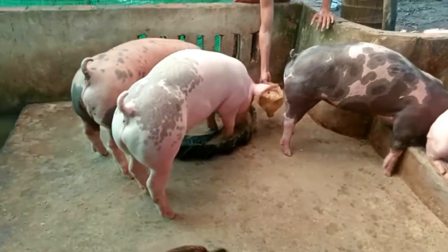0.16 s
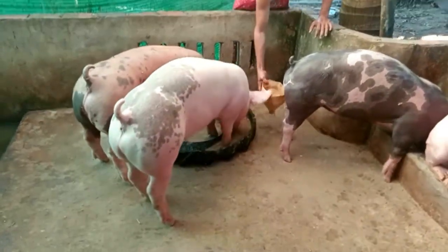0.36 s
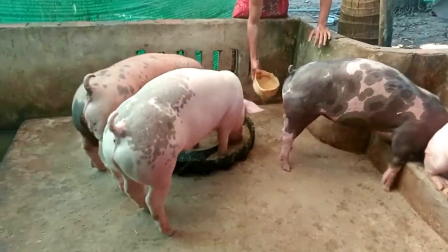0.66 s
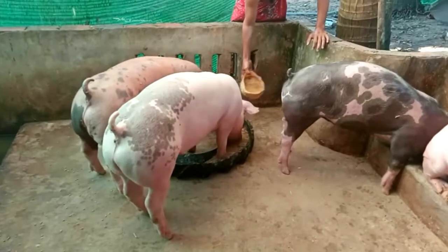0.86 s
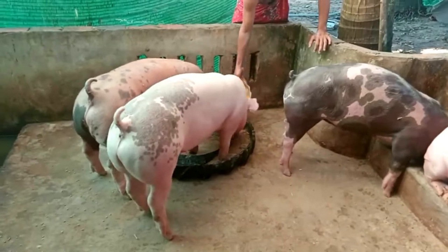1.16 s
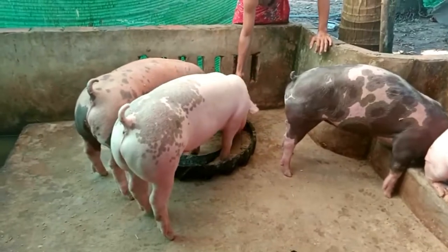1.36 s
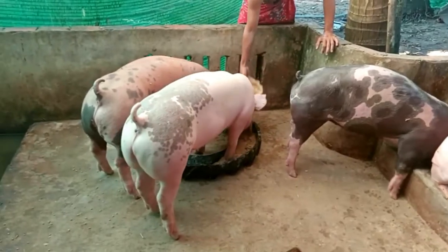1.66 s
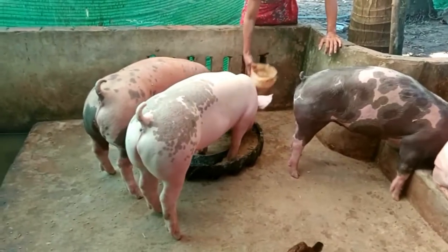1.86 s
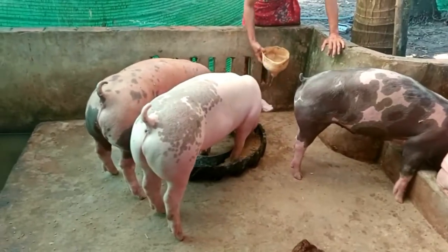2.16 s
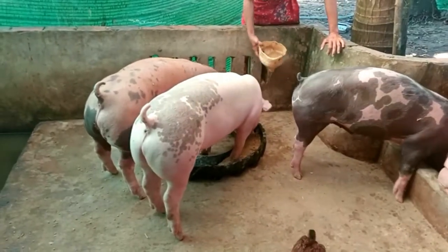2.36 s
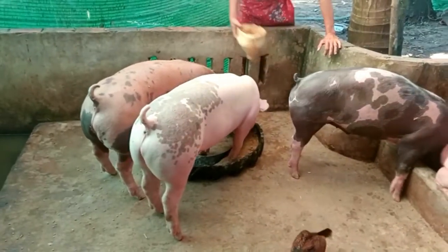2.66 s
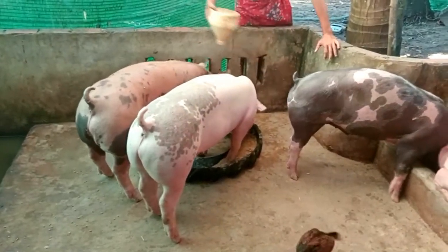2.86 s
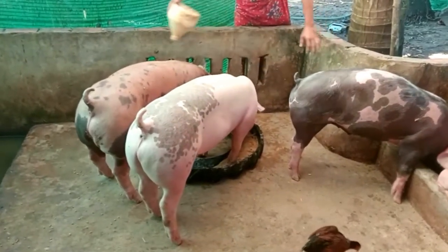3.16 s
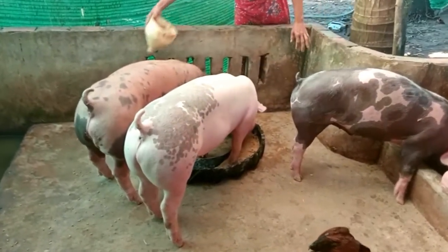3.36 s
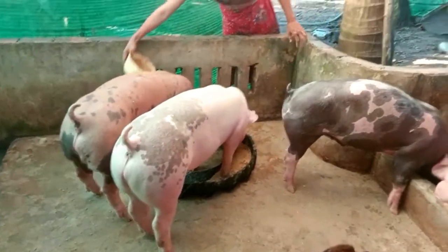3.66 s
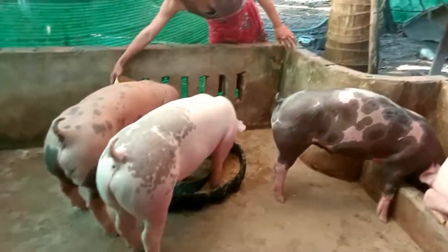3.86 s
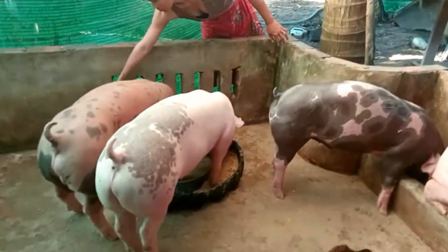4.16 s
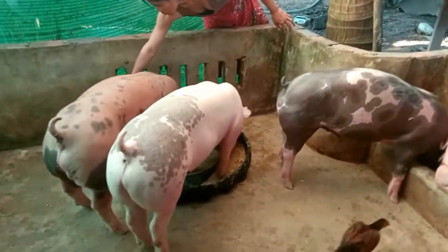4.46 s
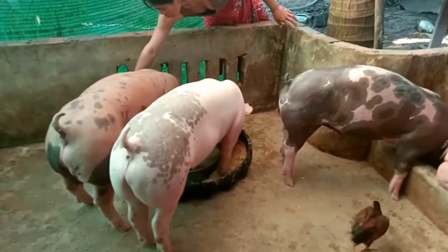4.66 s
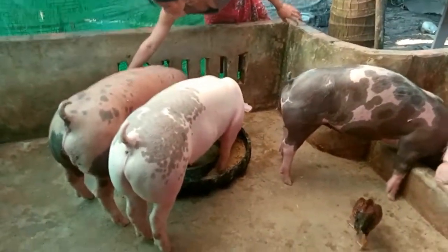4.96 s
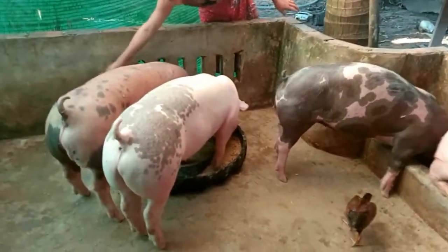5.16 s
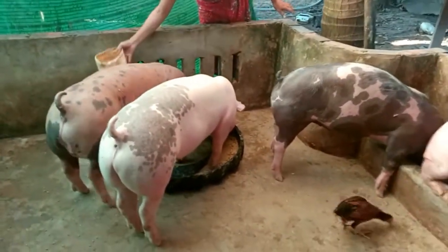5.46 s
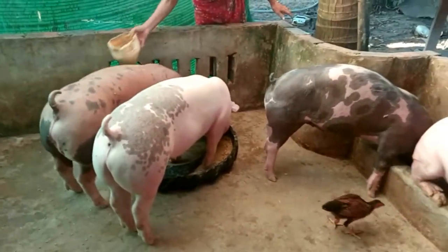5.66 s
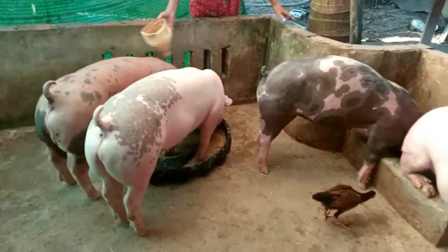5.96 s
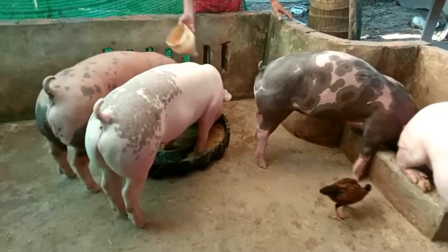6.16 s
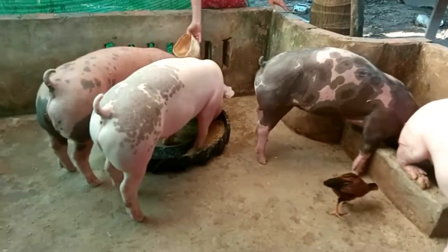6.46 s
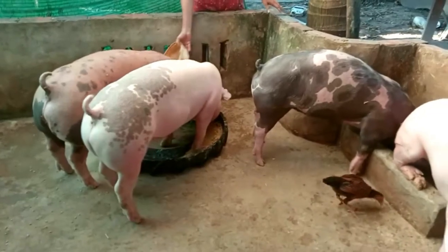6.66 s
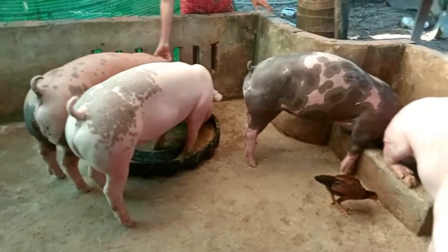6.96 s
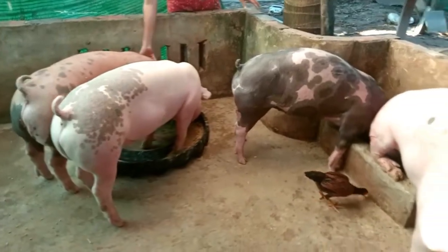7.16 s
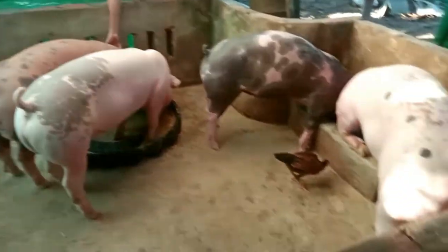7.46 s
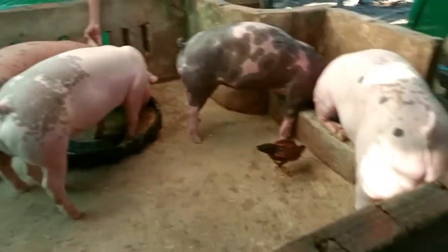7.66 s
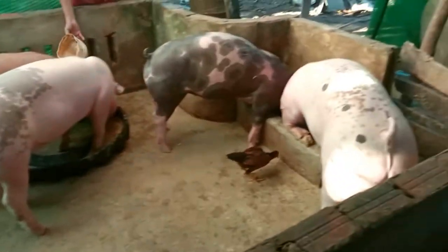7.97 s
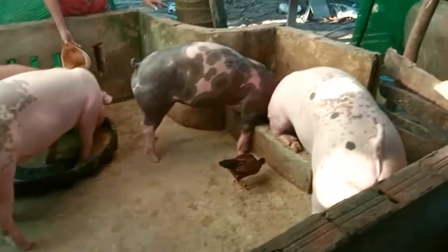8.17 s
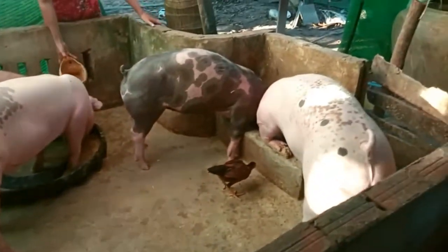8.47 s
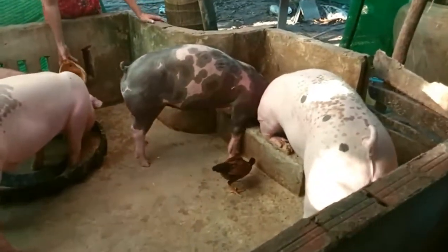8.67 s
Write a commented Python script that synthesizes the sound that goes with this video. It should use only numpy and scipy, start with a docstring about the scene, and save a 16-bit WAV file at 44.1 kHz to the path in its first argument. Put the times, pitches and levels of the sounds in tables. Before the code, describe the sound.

Pigs gobble mash from a bowl and trough, captured fairly close in mono. It starts with softer licking and squelching, then sharp saliva smacks, mouth pops and low jaw knocks build around a steady, uneven chomping rhythm. Muffled short grunts and fine saliva crackles slip between bites. The loudest, juiciest chomps come in the last two seconds, with a short hard-walled pen echo.

```python
"""Pigs chomp wet mash from a bowl and a trough in a concrete pen, over the faint hush of the yard.
From the start tongues lick and slurp between soft grunts, as bursting films and narrow bands of noise.
Lips smack as torn saliva rings the mouth; suction pops and jaw thuds join in, as damped low rings.
About three bites a second swell in the squelch, spray, hollow and throat; later saliva crackles too.
The low walls of the pen answer briefly."""
import sys
import numpy as np
from scipy import signal
from scipy.fft import rfft, irfft, next_fast_len
from scipy.io import wavfile
from scipy.ndimage import uniform_filter1d, map_coordinates

SR = 44100
rng = np.random.default_rng(int(sys.argv[2]) if len(sys.argv) > 2 else 0)


def output_pcm(signal):
    """Save a mono or channel-first signal as 16-bit PCM at the path in sys.argv[1].

    Samples are clipped to [-1, 1] before scaling.
    """
    pcm = np.clip(np.atleast_2d(signal).T, -1, 1) * 32767
    wavfile.write(sys.argv[1], SR, np.round(pcm).astype(np.int16))


N = 388962  # samples in the scene

# Lips and tongue tearing loose. Each row: start in seconds, peak of the direct sound in dB,
# mouth resonance in Hz.
SMACK_EVENTS = [(0.164, -19, 1220), (0.683, -21.5, 1780), (1.158, -19.5, 2340), (1.33, -22, 1570),
                (1.891, -16.5, 2160), (2.072, -14.5, 2090), (2.099, -12.5, 2230), (2.122, -11.5, 1900),
                (2.196, -17.5, 1740), (2.328, -16.5, 2280), (2.666, -13, 3330), (2.735, -5, 2980),
                (2.754, -24, 2550), (2.917, -14.5, 2280), (3.01, -15.5, 3300), (3.07, -10, 1680),
                (3.29, -19, 2630), (3.621, -14, 2940), (3.731, -15, 1840), (3.928, -13.5, 1320),
                (4.014, -13.5, 2410), (4.272, -21, 2940), (4.303, -13.5, 3080), (4.862, -17, 2420),
                (5.305, -18, 3040), (5.58, -18, 2900), (5.64, -12, 1950), (6.134, -19, 1405),
                (6.456, -15.5, 2840), (6.501, -6.5, 2000), (6.842, -9.5, 2210), (7.067, -15, 2180),
                (7.161, -13, 3660), (7.207, -9, 1390), (7.263, -8.5, 2540), (7.349, -12.5, 1890),
                (7.569, -6.5, 3280), (7.882, -9.5, 2470), (8.184, -12.5, 2160), (8.267, -9.5, 3300),
                (8.523, -9.5, 2050), (8.555, -8.5, 2080), (8.622, -15, 2840), (8.679, -6.5, 2600),
                (8.798, -11, 2060)]


def amp(db):
    """Decibels to gain."""
    return 10 ** (np.asarray(db) / 20)


def unit(x):
    """Scale to rms 1."""
    return x / np.sqrt(np.mean(x ** 2) + 1e-20)


def along(points, hz):
    """(Hz, value) points joined on a log frequency axis."""
    f, v = np.transpose(points)
    return np.interp(np.log(hz + 1), np.log(f + 1), v)


def filtered(x, response):
    """x times a complex response of frequency, zero-padded so that the end does not wrap round."""
    m = next_fast_len(len(x) + 8192)
    spectrum = rfft(x, m) * response(np.fft.rfftfreq(m, 1 / SR))
    return irfft(spectrum, m)[:len(x)]


def coloured(x, curve):
    """x through a filter curve in dB, at rms 1."""
    return unit(filtered(x, lambda hz: amp(along(curve, hz))))


def resonance(f, centre, width):
    """Causal response of one damped mode."""
    return 1j * f * width / (centre ** 2 - f ** 2 + 1j * f * width)


def add(track, s, sound):
    """Mix a sound into the track at s seconds."""
    part = track[max(round(s * SR), 0):][:len(sound)]
    part += sound[:len(part)]


def in_pen(x, wet_db):
    """x plus the echo of the concrete walls, which changes six times a second as the heads move."""
    # How long the pen rings. Each row: frequency in Hz, time to fall by 60 dB in seconds.
    pen_decay = [(150, 0.28), (700, 0.29), (2000, 0.36), (5500, 0.04), (14000, 0.14)]
    out = np.zeros(min(len(x) + SR // 2, N))
    hop = SR // 6
    for start in range(0, len(x), hop):
        hz, t, z = signal.stft(rng.standard_normal(SR // 4), SR, nperseg=256)
        decay = amp(-60 * t / along(pen_decay, hz)[:, None])
        tail = signal.istft(z * decay, SR, nperseg=256)[1]
        # direct sound, a short gap, then the diffuse tail
        answer = np.r_[1, np.zeros(SR // 300), amp(wet_db) * tail / np.linalg.norm(tail)]
        add(out, start / SR, signal.fftconvolve(x[start:start + hop], answer))
    return out


def yard():
    """The faint hush of the yard: steady coloured noise."""
    # Tone of the hush. Each row: frequency in Hz, relative level in dB per Hz.
    yard_curve = [(25, -29), (60, -1.5), (160, -2.5), (400, -17), (2300, 3.5), (5300, -29), (7900, -30),
                  (9800, -44), (15500, -37)]
    return amp(-42.5) * coloured(rng.standard_normal(N), yard_curve)


def chewing():
    """Tongues squelch, teeth press spray from the mash, mouth and throat ring, uneven with the lumps."""
    # Filters for tongue, spray, mouth and throat. Each row: frequency in Hz, relative gain in dB.
    squelch_curve = [(300, -45), (700, -2), (1100, -8), (1600, -4.5), (2100, -1.5), (2700, -1.5),
                     (3400, -2.5), (4200, -6.5), (5300, -18), (9000, -60)]
    spray_curve = [(400, -20), (900, -24.5), (2000, -1.5), (3500, 10.5), (4400, 5.5), (5300, 2), (6600, -1),
                   (7800, 1), (9000, -11), (10500, -16), (12000, -14.5), (13500, -11.5), (15500, -6)]
    hollow_curve = [(200, -33), (330, -8), (420, -7), (485, -0.5), (530, -4), (615, 2.5), (700, -7.5),
                    (900, -10.5), (1400, 1)]
    throat_curve = [(25, -47), (45, -38), (62, -27), (80, -17), (115, -4.5), (165, 2), (190, -6),
                    (225, 0.5), (290, -6.5), (400, -21), (700, -44)]
    fizz_hz = 5200  # above this the finest droplets come and go on their own
    squelch_gain, spray_gain, hollow_gain, throat_gain = mouth_levels()

    squelch = bubbles(rate=650, pitch_hz=1836, spread=0.715, cycles=5.3, size_db=5.0, size=440, wander=0.2546)
    squelch = steady(coloured(in_pen(squelch, wet_db=1.5), squelch_curve), window=0.042)
    squelch *= squelch_gain * lumps(depth_db=1.4, rate=30)

    spray = bubbles(rate=5000, pitch_hz=4410, spread=1.16, cycles=0.74, size_db=1.0, size=64, wander=0.1)
    spray = steady(coloured(in_pen(spray, wet_db=-2.5), spray_curve), window=0.066)
    fizz = filtered(spray, lambda hz: 1 - 1 / (1 + (hz / fizz_hz) ** 8))
    coarse = lumps(depth_db=1.9, rate=25) * (spray - fizz)
    fine = lumps(depth_db=2.3, rate=35) * fizz
    wet = squelch + spray_gain * (coarse + fine)

    hollow = bubbles(rate=500, pitch_hz=600, spread=0.65, cycles=1.17, size_db=3.5, size=440, wander=0.19)
    hollow = steady(coloured(in_pen(hollow, wet_db=-1), hollow_curve), window=0.047)
    hollow *= hollow_gain * lumps(depth_db=2.5, rate=25)

    throat = steady(coloured(rng.standard_normal(N), throat_curve), window=0.13)
    throat *= throat_gain * lumps(depth_db=2.5, rate=24)
    return wet * lips() + hollow + throat


def mouth_levels():
    """Gains of squelch, spray, hollow and throat: powers of bites and licks add to the idle chewing."""
    # The other mouths never rest. Levels in dB of squelch, spray, hollow and throat.
    idle_db = [-41.5, -49, -58, -53.5]
    # The jaw closes on a mouthful. Each row: start in seconds, length in seconds, tongue squelch in dB,
    # spray of crushed mash in dB, hollow of the mouth in dB.
    bite_strokes = [(-0.005, 0.018, -27.5, -31, -32.5), (0.341, 0.18, -28.5, -36.0, -28.5),
                    (0.76, 0.06, -25, -33.5, -32.5), (1.089, 0.063, -26, -32, -37.5),
                    (1.368, 0.11, -27, -39.5, -37.5), (1.689, 0.024, -27.5, -40, -37.5),
                    (1.995, 0.127, -28.0, -36, -35), (2.312, 0.14, -25.0, -35, -33.5),
                    (2.631, 0.058, -23, -31.5, -29.5), (2.938, 0.09, -23, -33.5, -32),
                    (3.359, 0.088, -24.5, -32.5, -32.5), (3.622, 0.13, -23.5, -33.5, -35.5),
                    (3.961, 0.059, -20, -28.5, -26.5), (4.283, 0.06, -21, -30, -26.5),
                    (4.572, 0.091, -24, -35, -41), (4.922, 0.12, -22, -30.5, -32),
                    (5.273, 0.098, -22, -29.5, -28), (5.669, 0.055, -26, -28, -32),
                    (6.125, 0.086, -24, -33, -33), (6.479, 0.038, -22, -29, -30),
                    (6.806, 0.06, -26.5, -31.5, -37.5), (7.1, 0.2, -23.5, -29.5, -33.5),
                    (7.269, 0.11, -25, -33.5, -31.5), (7.531, 0.13, -19, -25.5, -30),
                    (7.892, 0.1, -18.0, -26.0, -29), (8.227, 0.14, -20, -28, -27.5),
                    (8.57, 0.15, -19.5, -27.5, -30.5)]
    # Softer tongue work between the bites. Each row: start in seconds, length in seconds,
    # tongue squelch in dB, hollow of the mouth in dB.
    lick_strokes = [(0.115, 0.17, -32, -40), (0.563, 0.21, -32.5, -39.5), (0.993, 0.08, -31, -44),
                    (1.315, 0.03, -28, -40.5), (1.58, 0.076, -36.5, -50), (1.898, 0.081, -35, -46.5),
                    (2.194, 0.088, -27.5, -36), (2.551, 0.039, -26.0, -44), (2.736, 0.143, -29.5, -40),
                    (3.068, 0.086, -30, -39.5), (3.259, 0.051, -31, -37), (3.492, 0.097, -29.5, -38.5),
                    (3.785, 0.035, -27, -36.5), (4.068, 0.043, -27, -32), (4.201, 0.026, -31.5, -41),
                    (4.402, 0.033, -27, -36), (4.686, 0.069, -28, -42.0), (4.848, 0.031, -36, -45),
                    (5.153, 0.094, -31, -48), (5.428, 0.042, -30, -43), (5.554, 0.058, -25, -39.5),
                    (5.764, 0.14, -33.5, -42), (5.938, 0.1, -34.5, -54), (6.223, 0.032, -32.0, -37),
                    (6.407, 0.045, -30, -45), (6.556, 0.13, -42, -47), (6.715, 0.091, -30.5, -56),
                    (7.047, 0.045, -30, -37.5), (7.39, 0.06, -28.5, -43), (7.693, 0.095, -30.5, -40),
                    (8.04, 0.079, -26, -34.5), (8.183, 0.027, -22.5, -52), (8.417, 0.052, -34, -57),
                    (8.53, 0.023, -22.5, -44), (8.779, 0.05, -24, -36)]
    lick_spray_db = -15  # relative to the squelch of the lick
    bite_throat_db, lick_throat_db = -6, -5  # relative to the hollow of the mouth
    throat_lag_s = 0.013  # the throat follows the mouth

    power = amp(idle_db)[:, None] ** 2 * np.ones(N)
    for s, length, squelch_db, spray_db, hollow_db in bite_strokes:
        gains = amp([squelch_db, spray_db, hollow_db, hollow_db + bite_throat_db])
        power += np.outer(gains ** 2, stroke(s, length, attack=0.034, release=0.042, arch_db=2.0))
    for s, length, squelch_db, hollow_db in lick_strokes:
        gains = amp([squelch_db, squelch_db + lick_spray_db, hollow_db, hollow_db + lick_throat_db])
        # a negative arch makes the lick dip halfway: strongest at its ends
        power += np.outer(gains ** 2, stroke(s, length, attack=0.019, release=0.033, arch_db=-1.5))
    squelch, spray, hollow, throat = np.sqrt(power)
    late_throat = np.interp(np.arange(N) - throat_lag_s * SR, np.arange(N), throat)
    return squelch, spray, hollow, late_throat


def stroke(s, length, attack, release, arch_db):
    """Power of one mouth movement: it swells, holds in an arch and dies away (time constants in s)."""
    t = np.arange(-SR // 4, int((length + .4) * SR)) / SR
    fade = np.exp(np.minimum(t, 0) / attack - np.maximum(t - length, 0) / release)
    arch = amp(arch_db * (np.sin(np.pi * np.clip(t / length, 0, 1)) - 1.0))
    power = np.zeros(N + SR)  # a second of lead-in, for strokes that swell before the start
    add(power, s + t[0] + 1, (fade * arch) ** 2)
    return power[SR:]


def bubbles(rate, pitch_hz, spread, cycles, size_db, size, wander):
    """Bursting films of wet feed: damped rings, size samples long, whose pitch wanders with the tongue."""
    count = int(rate * N / SR)
    tongue = rng.standard_normal(N // 1400)
    start, luck, pitch = rng.random((count, 3)).T[:, :, None]
    shape = map_coordinates(tongue, [start * (len(tongue) - 1)])
    hz = pitch_hz * np.exp(spread * (2 * pitch - 1) + wander * shape)
    hz = np.clip(hz, 80, SR / 2.5)
    t = np.arange(size) / SR
    # many small films, a few large ones
    strength = amp(size_db * np.minimum(-np.log(1 - luck), 3)) * np.sqrt(hz)
    rings = strength * np.exp(-t * hz / cycles) * np.sin(2 * np.pi * hz * t)
    where = (start * N).astype(int) + np.arange(size)
    return unit(np.bincount(where.ravel(), rings.ravel(), N)[:N])


def steady(x, window):
    """x with swells longer than the window (s) evened out, so that only the grain is left."""
    return x / np.sqrt(np.abs(uniform_filter1d(x ** 2, int(window * SR))) + 1e-6)


def lumps(depth_db, rate):
    """A gain that wavers as lumps of feed pass through the mouth."""
    return unit(amp(depth_db * wobble(rate)))


def wobble(rate):
    """A smooth random curve, rate knots a second."""
    knots = rng.standard_normal(N // 200)
    return map_coordinates(knots, [np.arange(N) * rate / SR], mode="mirror")


def lips():
    """Gain of the wet noise: sealed lips hush it just before a smack."""
    seal_db, seal_s = -3.0, 0.038  # change at the smack, time constant of the approach
    db = np.zeros(N)
    before = np.arange(SR // 10)[::-1] / SR
    for s, _, _ in SMACK_EVENTS:
        add(db, s - before[0], seal_db * np.exp(-before / seal_s))
    return amp(db)


def mouth_sounds():
    """Slurps, grunts, smacks, pops, thuds and crackles, each with its own echo."""
    # Air sucked past the tongue, the gap changing shape. Each row: start in seconds, length in seconds,
    # start pitch in Hz, end pitch in Hz, rms of the direct sound in dB.
    slurp_events = [(0.067, 0.046, 777, 970, -36.5), (.16, 0.035, 900, 835, -35),
                    (.68, 0.058, 812, 765, -38), (0.94, 0.049, 1416, 1110, -37.5),
                    (0.975, 0.056, 1073, 1137, -34.5), (1.014, .04, 1200, 1670, -41),
                    (0.951, 0.063, 2590, 2000, -35.5), (1.272, 0.045, 2130, 2680, -36),
                    (1.485, 0.032, 1190, 1250, -37.5), (1.562, .05, 2035, 1726, -36.5),
                    (1.825, .05, 1690, 1970, -37), (2.441, 0.038, 1755, 1690, -31),
                    (3.23, 0.041, 855, 1000, -46), (3.92, 0.027, 1275, 1880, -20.5),
                    (4.071, 0.066, 2500, 2570, -31.5), (4.188, .07, 1102, 770, -35.5),
                    (4.587, 0.058, 1860, 2210, -27), (5.094, 0.026, 3580, 3500, -35),
                    (5.69, .04, 3380, 3240, -28.5), (5.922, 0.053, 1937, 2100, -33.5),
                    (6.021, 0.091, 1590, 850, -39.5), (6.258, .09, 2750, 2670, -51),
                    (6.682, 0.15, 3340, 2750, -40), (7.372, 0.13, 3365, 2725, -34),
                    (7.8, 0.033, 1344, 1360, -34.5), (8.774, 0.051, 1985, 2170, -26)]
    # Soft grunts with a closed mouth. Each row: start in seconds, length in seconds, pitch in Hz,
    # rms of the direct sound in dB.
    grunt_events = [(.075, 0.048, 183, -44), (.24, .09, 239, -39), (.6, 0.053, 226, -40.5),
                    (1.578, 0.057, 211, -38.5), (1.945, 0.06, 166, -45), (2.91, 0.058, 162, -39),
                    (3.065, .05, 173, -47), (3.37, 0.043, 244, -36), (4.09, 0.067, 162, -39),
                    (4.41, 0.053, 184, -40), (5.035, 0.044, 219, -37.5), (5.135, 0.068, 203, -44),
                    (5.46, 0.055, 204, -40), (5.58, 0.11, 214, -37), (5.754, 0.04, 201, -32),
                    (5.951, 0.06, 213, -36), (6.15, 0.053, 157.5, -41), (6.288, 0.12, 205, -40.5),
                    (6.745, .05, 190, -41), (7.005, 0.068, 161, -43), (7.615, 0.058, 296, -37),
                    (7.81, 0.047, 217, -44), (8.05, 0.063, 201, -34), (8.375, 0.038, 215, -42),
                    (8.45, 0.042, 160, -39), (8.738, 0.049, 219.5, -35.5)]
    # Suction pops of the opening mouth. Each row: start in seconds, peak of the direct sound in dB,
    # cavity pitch in Hz.
    pop_events = [(0.35, -25.5, 603), (0.511, -24.5, 564), (1.332, -19.5, 774), (2.116, -20.5, 619),
                  (2.273, -24.5, 612), (2.372, -18.5, 604), (2.575, -24.5, 664), (2.617, -22.5, 591),
                  (2.932, -25.5, 580), (2.999, -23, 498), (3.322, -25, 588), (3.636, -21.5, 550),
                  (3.917, -18, 575), (4.207, -24, 700), (4.251, -28, 626), (4.378, -22.5, 662),
                  (4.6, -23.5, 576), (4.914, -23.5, 500), (5.326, -21.5, 582), (5.955, -29, 492),
                  (6.134, -25, 485), (6.192, -25, 621), (6.455, -18.5, 572), (6.784, -21.5, 554),
                  (6.824, -21, 593), (7.159, -9.5, 615), (7.281, -20.5, 569), (7.521, -20.5, 602),
                  (7.554, -16, 504), (7.883, -14, 613), (7.911, -12.5, 595), (8.557, -16, 620),
                  (8.631, -19, 585)]
    # Jaws shutting on the mash. Each row: start in seconds, peak of the direct sound in dB,
    # pitch of the knock in Hz.
    thud_events = [(0.405, -25.5, 168), (2.076, -32, 273), (2.38, -18.5, 168.4), (2.654, -25, 179),
                   (2.999, -23, 161), (3.368, -28, 166), (3.664, -24, 254), (3.968, -21.5, 156),
                   (4.288, -19.5, 166), (4.608, -22.5, 185), (4.921, -22.5, 170), (5.333, -17.5, 169),
                   (5.676, -20, 168), (6.454, -16, 221), (6.826, -22.5, 165), (7.198, -14.5, 247),
                   (7.323, -13, 212), (7.564, -19, 238), (7.922, -16.5, 162), (8.258, -19.5, 250),
                   (8.335, -18.5, 222), (8.579, -19.5, 218), (8.682, -17.5, 230)]
    # Saliva crackling between the teeth. Each row: start in seconds, peak of the direct sound in dB.
    crackle_events = [(2.072, -31), (2.385, -32), (2.855, -35), (3.285, -33.5), (3.918, -31), (4.258, -28),
                      (4.708, -35), (5.538, -33), (5.8, -34), (6.098, -32), (7.454, -30), (7.88, -25)]

    track = np.zeros(N)
    for s, length, start_hz, end_hz, db in slurp_events:
        slurp = sliding_air(length, start_hz, end_hz, width_hz=0.1 * start_hz)
        add(track, s, amp(db) * in_pen(slurp, wet_db=-9.0))
    for s, length, hz, db in grunt_events:
        grunt = sliding_air(length, hz, hz, width_hz=43.5)
        add(track, s, amp(db) * in_pen(grunt, wet_db=-6))
    for s, db, hz in SMACK_EVENTS:
        wet_smack = smack(hz, life=0.016, width_share=0.21, dull_hz=4260)
        add(track, s, amp(db) * in_pen(wet_smack, wet_db=-6.5))
    for s, db, hz in pop_events:
        suction_pop = pop(hz, rise=0.001, life=0.013, lift=0.054, rough=1.8)
        add(track, s, amp(db) * in_pen(suction_pop, wet_db=-6))
    for s, db, hz in thud_events:
        jaw_thud = thud(hz, width_hz=15.3, life=0.0066, slop=0.16, flesh=0.18)
        add(track, s, amp(db) * in_pen(jaw_thud, wet_db=-8.5))
    for s, db in crackle_events:
        spatter = crackle(life=0.034, size_db=3.0)
        add(track, s, amp(db) * in_pen(spatter, wet_db=0))
    return track


def sliding_air(length, start_hz, end_hz, width_hz):
    """Slurp or grunt: a narrow band of noise, sliding or level in pitch, swelling quickly and fading."""
    u = np.linspace(0, 1, int(length * SR))
    flutter = np.array([1, 1j]) @ rng.standard_normal((2, SR // 4))
    narrow = signal.butter(2, width_hz / 2, fs=SR, output="sos")
    flutter = signal.sosfilt(narrow, flutter)[-len(u):]  # the settled end of the noise
    hz = start_hz * (end_hz / start_hz) ** u
    air = np.real(flutter * np.exp(2j * np.pi * np.cumsum(hz) / SR))
    return unit(np.sin(np.pi * u ** 0.56) * air)


def smack(mouth_hz, life, width_share, dull_hz):
    """A film of saliva tears in a quick volley of clicks that ring the mouth."""
    t = np.arange(SR // 12) / SR
    clicks = rng.standard_normal(len(t))
    tear = clicks * np.abs(clicks) * np.exp(-t / life)
    tear /= np.linalg.norm(tear)
    tear[0] += .35  # the first snap
    width_hz = width_share * mouth_hz
    ring = filtered(tear, lambda f: resonance(f, mouth_hz, width_hz) * resonance(f, 1700, 3000))
    ring = signal.sosfilt(signal.butter(N=6, Wn=dull_hz, fs=SR, output="sos"), ring)
    return ring / np.abs(ring).max()


def pop(cavity_hz, rise, life, lift, rough):
    """Suction lets go and the cheek cavity rings, its pitch lifting as the mouth opens."""
    t = np.arange(SR // 10) / SR
    drift = np.cumsum(rng.standard_normal(len(t))) / np.sqrt(len(t))
    hz = cavity_hz * (1 + lift * (.5 - np.exp(-t / life)))
    swell = (1 - np.exp(-t / rise)) * np.exp(-t / life)
    ring = swell * np.sin(2 * np.pi * np.cumsum(hz) / SR + rough * drift)
    return ring / np.abs(ring).max()


def thud(knock_hz, width_hz, life, slop, flesh):
    """The jaw shuts: one soft push and some slop into a low knock and the dull flesh around it."""
    t = np.arange(SR // 7) / SR
    push = slop * rng.standard_normal(len(t)) * np.exp(-t / life)
    push[0] += 1

    def jaw(f):
        """Narrow knock plus broad flesh, softened together."""
        body = resonance(f, knock_hz, width_hz) + flesh * resonance(f, 190, 260)
        return body * resonance(f, 196, 300)

    ring = filtered(push, jaw)
    return ring / np.abs(ring).max()


def crackle(life, size_db):
    """A film of saliva bursts into a quick spatter of tiny bright clicks."""
    # Tone of the spatter. Each row: frequency in Hz, relative gain in dB.
    crackle_curve = [(1500, -30), (3500, -4), (5200, 8), (6600, 2.5), (7800, -1), (9000, -10), (11500, -17),
                     (13500, -16), (15500, -10)]
    t = np.arange(SR // 8) / SR
    sizes = amp(size_db * np.minimum(rng.exponential(size=len(t)), 4))
    clicks = rng.standard_normal(len(t)) * sizes * np.exp(-t / life)
    spatter = coloured(clicks, crackle_curve)
    return spatter / np.abs(spatter).max()


def scene():
    """The feeding pigs over the faint hush of the yard."""
    return (yard() + chewing() + mouth_sounds())[None]


def record(dry):
    """The recorder loses the deepest bass and keeps nothing above its band limit."""
    bass_hz, top_hz = 34, 15750

    def band(hz):
        """Bass roll-off and a sharp upper limit."""
        return (hz < top_hz) * hz ** 2 / (hz ** 2 + bass_hz ** 2)

    return np.array([filtered(x, band) for x in dry])


dry = scene()
out = record(dry)
output_pcm(out)
```